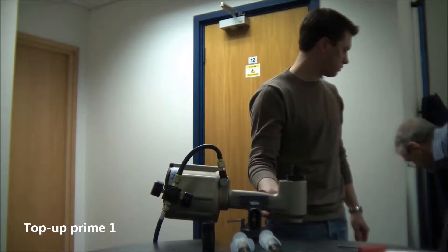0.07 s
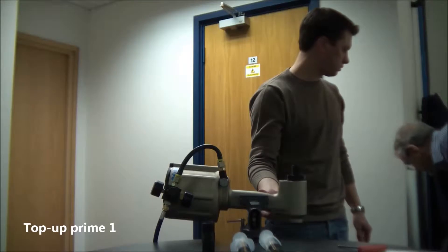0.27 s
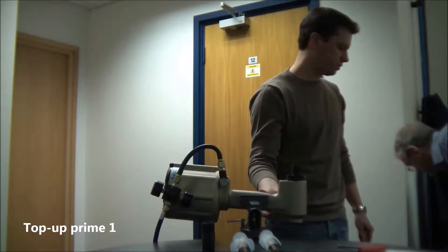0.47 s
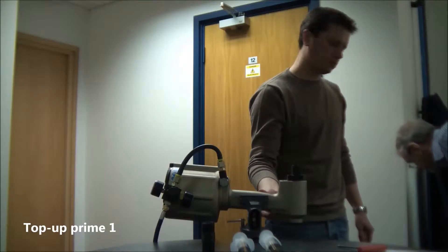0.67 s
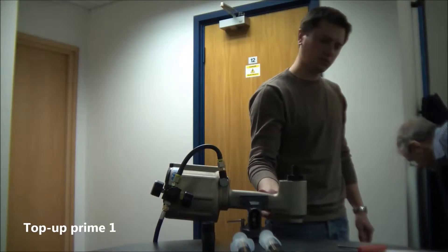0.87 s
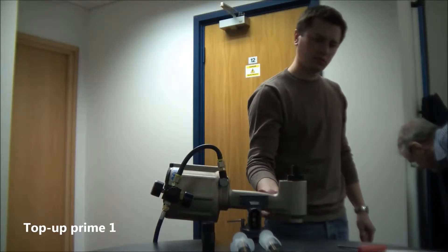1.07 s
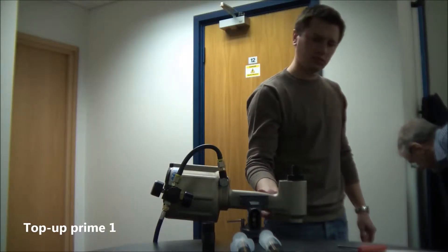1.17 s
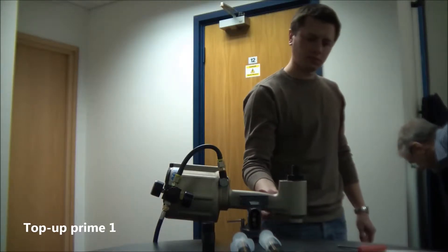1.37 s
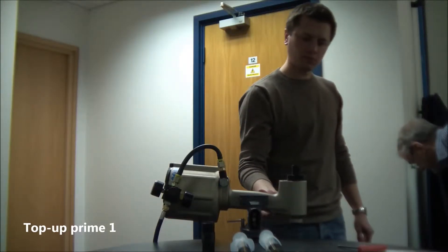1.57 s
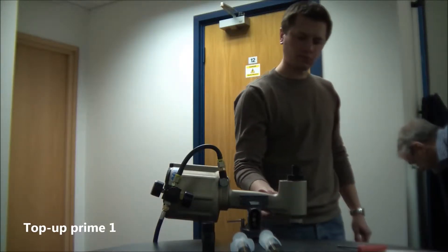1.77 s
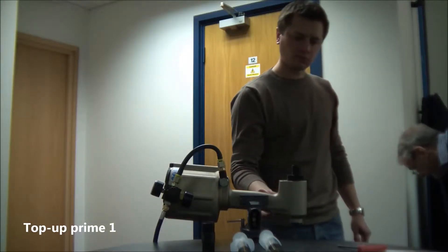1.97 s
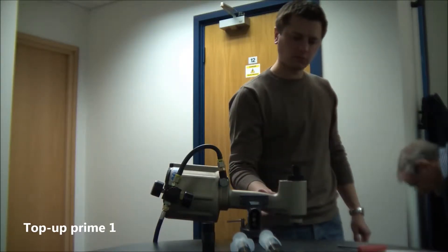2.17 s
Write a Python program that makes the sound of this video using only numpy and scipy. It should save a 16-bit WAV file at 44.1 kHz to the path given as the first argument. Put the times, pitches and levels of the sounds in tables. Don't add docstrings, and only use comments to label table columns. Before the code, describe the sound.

Compressed air escapes a tool close to the microphone: a faint leak and low hum, a sudden crack and overloaded blast, then a fading hiss with airy whistles and low hose gurgles in a small office.

```python
import sys
import numpy as np
from scipy import signal
from scipy.io import wavfile
from scipy.ndimage import uniform_filter1d

SR = 44100
rng = np.random.default_rng(int(sys.argv[2]) if len(sys.argv) > 2 else 0)


def generate_wav(sig):
    pcm = np.round(np.clip(np.atleast_2d(sig).T, -1, 1) * 32767).astype(np.int16)
    wavfile.write(sys.argv[1], SR, pcm)


def voltage_ratio(level):
    return 10 ** (np.asarray(level, float) / 20)


N = 97020

# pitch_hz, level_db
PORT_WIDTH = [(60, -12), (130, -25), (290, -35), (640, -27.5), (1400, -15.5), (3080, -11), (6760, -1.5),
              (14800, -2)]
# pitch_hz, level_db
PORT_LEAN = [(60, -1.0), (180, 0), (540, 0.12), (1640, 0.66), (4930, 0.23), (10000, 0), (14800, 1.2)]
SOURCE_WIDTH_HZ = 4600
# start_s, level_db
ROOM_GAIN = [
    (0, 0),
    (.21, 0),
    (.3, -11),
    (1.22, -8),
    (1.32, -2),
    (1.7, -2),
    (2.17, -2.5),
    (2.2, -3.5),
]
OVERLOAD = 1.27

# pitch_hz, level_db (per Hz)
RUMBLE, RUMBLE_DB = [(15, 4), (40, -0.5), (70, -2), (130, -11.5), (200, -41)], -36.5
# pitch_hz, level_db
HUM = [(100, -37.5), (200, -49)]
# pitch_hz, level_db (per Hz)
LEAK_BEFORE, LEAK_BEFORE_DB = [(76, -33), (130, -3.5), (250, -12), (374, -11), (430, -4.5), (525, -16.5),
                               (2540, -17.5), (3360, -3), (4300, -12), (6110, -15.5), (15300, -17)], -26.5
# pitch_hz, level_db (per Hz)
LEAK_AFTER, LEAK_AFTER_DB = [(76, -38), (130, -6.5), (250, -10.5), (448, -3), (485, -4.5), (956, -4.5),
                             (1770, -6), (3430, -5.5), (9860, -14), (15300, -26)], -26
# pitch_hz, level_db
DULL = [(12600, -3), (13300, -11), (15400, -11)]
# pitch_hz, width_hz, level_db
FITTING = [(3110, 620, -36), (3276, 57, -37.5), (3560, 300, -35.5), (3790, 120, -43.5), (14500, 900, -40),
           (5600, 680, -38), (10720, 1300, -34.5), (15078, 20, -43)]

# pitch_hz, level_db (per Hz)
CRACK, CRACK_S, CRACK_DB = [(350, -34), (600, -9), (1570, -8), (2560, -5), (2740, -7), (15300, -6)], 0.167, -18.5
POP_S, POP_DB, POP_RISE_S = 0.2108, -1.5, 0.00052
# pitch_hz, level_db, t60_s
POP = [
    (97, -1, 0.077),
    (300, -1, 0.018),
    (534, -12, 0.017),
    (900, 11.5, 0.0049),
    (1750, 3.5, 0.012),
]

# start_s, length_s, level_db, pitch_hz, width_hz
BLOWN = [(0.211, 0.077, -12, 2220, 77), (.27, 0.087, -15, 2280, 64), (.26, 0.096, -20.5, 1650, 92),
         (.212, 0.16, -10, 4510, 340), (0.213, 0.17, -11.5, 5260, 700), (.22, 0.14, -12, 5900, 860),
         (.21, .06, -19, 2700, 65), (.28, 0.084, -20.5, 2780, 270), (0.212, 0.12, -10, 10580, 930),
         (0.222, 0.11, -14.5, 12000, 2600), (0.21, .11, -19, 14300, 1400), (0.2084, 0.14, -8.5, 7600, 2900),
         (.211, 0.037, -12, 475, 250), (.213, 0.055, -16, 176, 100), (.213, 0.117, -20, 52, 73),
         (.22, 0.16, -21.5, 365, 220), (.24, 0.11, -20, 195, 194), (.25, 0.13, -21.5, 590, 320),
         (.36, 0.15, -39, 220, 120)]
# start_s, length_s, level_db, pitch_hz, width_hz
PIPES = [(0.25, 0.26, -24, 1850, 280), (0.49, 0.35, -28.5, 1650, 91), (0.37, 0.33, -26.5, 1830, 72),
         (0.632, 0.18, -21.5, 1800, 100), (0.712, 0.19, -19.5, 1775, 93), (0.4, .09, -22.5, 2100, 54),
         (0.465, 0.15, -24.5, 2100, 80), (.65, 0.15, -21.5, 2310, 74), (0.584, 0.11, -27, 2800, 55),
         (.52, .06, -29, 2910, 60), (0.804, 0.13, -19.5, 2340, 99), (0.825, 0.1, -22, 2570, 130),
         (0.905, 0.094, -23.5, 2680, 130), (0.98, 0.065, -24.5, 2080, 63), (1.044, 0.18, -23, 1840, 420),
         (1.03, 0.2, -21, 2480, 470), (1.05, 0.19, -24.5, 3550, 200), (1.074, 0.15, -30.5, 735, 184),
         (1, 0.074, -25.5, 10500, 1400), (1.22, 0.17, -24.5, 2440, 250), (1.19, 0.24, -23, 3440, 300),
         (1.205, 0.19, -29, 3150, 270), (1.36, 0.13, -28, 3470, 330), (1.92, 0.37, -33.5, 3460, 450),
         (1.26, 0.078, -34, 94, 49), (1.445, 0.12, -24, 5400, 1400), (1.48, 0.095, -26.5, 2400, 72),
         (1.772, 0.29, -26.5, 2120, 540), (1.778, 0.24, -31.5, 1570, 180), (1.79, .15, -31, 2920, 270)]
# start_s, length_s, level_db, pitch_hz, width_hz
GURGLES = [
    (1.36, 0.14, -28.5, 382, 202),
    (1.38, 0.14, -30.5, 810, 300),
    (1.37, 0.13, -34.5, 171, 80),
    (1.43, 0.14, -30.5, 603, 80),
    (1.47, 0.22, -34, 422, 200),
    (1.51, 0.15, -35.5, 840, 120),
    (1.57, 0.27, -28.5, 444, 217),
    (1.6, 0.18, -32.5, 663, 103),
]
# start_s, length_s, level_db, pitch_hz, width_hz
WHISTLE = [
    (1.17, 0.24, -25.5, 6720, 380),
]
STEADY, WHISTLE_HZ = 0.55, 170

# start_s, level_db, brightness (0-1)
FLOW = [(0.213, 3, 0.3), (0.223, -6, 0.3), (0.281, -5.5, 0.3), (0.485, -14, 0.3), (0.879, -16, 0.3),
        (0.957, -16, 0.3), (1.347, -21, 0.3), (1.367, -21.5, 0.3), (1.479, -19.5, 0.3), (1.783, -29.5, 0.3),
        (1.851, -25, 0.3), (2.1, -32, 0.3)]
# pitch_hz, level_db (per Hz)
BLAST = [(290, -33), (500, -11.5), (611, -5.5), (1010, -10), (1760, -2.5), (2870, 0), (4600, -0.5),
         (10700, -8), (15300, -9.5)]
# pitch_hz, level_db (per Hz)
VENT = [(180, -55), (310, -20.5), (1200, -8), (1440, -8.5), (1610, -3.5), (2380, -3.5), (3140, -5.5),
        (10700, -20), (15300, -22)]
# pitch_hz, level_db (per Hz)
LATE = [(530, -29), (900, -12), (1430, -7), (2160, -3.5), (3560, -3.5), (4350, -7.5), (5080, -7.5),
        (11100, -15.5), (15300, -15.5)]
EMPTY_S, EMPTY_SPAN_S = 1.23, 0.095
OFFICE_T60_S, OFFICE_DB = 0.31, -6

T = np.arange(N) / SR


def evened(x):
    return x / np.sqrt(np.mean(x ** 2) + 1e-20)


def read(points, hz):
    f, value = np.transpose(points)
    return np.interp(np.log(hz + 1), np.log(f + 1), value)


def curve(points, column):
    table = np.array(points)
    return np.interp(T, table[:, 0], table[:, column])


def drift(size):
    white = rng.standard_normal(N)
    return evened(uniform_filter1d(uniform_filter1d(white, size=size), size=size))


def air(colour_db, patchy_db, wider_db=0):
    frames = N // 256 + 5
    hz = np.fft.rfftfreq(1024, 1 / SR)
    a, b, c, d, patches = rng.standard_normal((frames, 513, 5)).T
    patches = uniform_filter1d(patches, size=8, axis=0)
    patches = evened(uniform_filter1d(patches, size=12, axis=1))
    side_db = read(PORT_WIDTH, hz) + wider_db * (hz < SOURCE_WIDTH_HZ)
    side = voltage_ratio(2 * np.minimum(side_db, 0))[:, None]
    same = (1 - side) / (1 + side)
    lean = voltage_ratio(0.5 * read(PORT_LEAN, hz))[:, None]
    left = a + 1j * b
    right = same * left + np.sqrt(1 - same ** 2) * (c + 1j * d)
    z = np.array([left * lean, right / lean])
    z *= voltage_ratio(colour_db(hz)[:, None] + patchy_db * patches)
    return evened(signal.istft(z, nperseg=1024, noverlap=768)[1][:, :N])


def resonate(x, hz, width, steady=0):
    turn = np.exp(2j * np.pi * np.cumsum(hz * np.ones(x.shape[1])) / SR)
    r = np.exp(-np.pi * 1.5 * width / SR)
    ring = abs(1 - r) * signal.lfilter([1], np.convolve([1, -r], [1, -r]), x / turn)
    ring = evened(ring.view(float)).view(complex)
    level = abs(ring.mean(0)) + 0.1
    return evened((turn * ring / level ** steady).real)


def rumble():
    return voltage_ratio(RUMBLE_DB) * air(lambda hz: read(RUMBLE, hz), patchy_db=1.5)


def hum():
    tones = sum(np.sqrt(2) * voltage_ratio(db) * np.sin(2 * np.pi * hz * T) for hz, db in HUM)
    return voltage_ratio(1.6 * drift(1500)) * tones


def leak(spent):
    before = air(lambda hz: read(LEAK_BEFORE, hz), patchy_db=1.5, wider_db=-1)
    after = air(lambda hz: read(LEAK_AFTER, hz) + read(DULL, hz), patchy_db=1)
    hiss = (1 - spent) * voltage_ratio(LEAK_BEFORE_DB) * before + spent * voltage_ratio(LEAK_AFTER_DB) * after
    white = air(np.zeros_like, patchy_db=1.5, wider_db=-6)
    for hz, width, db in FITTING:
        loss_db = 3.1 * (hz > 8000) + 25 * (hz > 13000)
        hiss = hiss + voltage_ratio(db - spent * loss_db) * resonate(white, hz, width)
    return hiss


def room():
    spent = np.clip((T - 0.3) / 1.5, 0, 1)
    return (leak(spent) + rumble() + hum()) * voltage_ratio(curve(ROOM_GAIN, column=1))


def office(x):
    at = np.arange(130, SR // 2, 20)
    at = at + rng.integers(0, 20, len(at))
    taps = np.zeros(SR // 2 + 20)
    taps[at] = rng.choice([-1., 1.], len(at)) * voltage_ratio(-60 * at / SR / OFFICE_T60_S)
    taps /= np.linalg.norm(taps)
    return x + voltage_ratio(OFFICE_DB) * signal.fftconvolve(x, taps[None], axes=1)[:, :N]


def crack():
    u = (T - CRACK_S) / (POP_S - CRACK_S)
    swell = np.clip(u, 0, 1) ** 0.37 * (u < 1.2)
    return voltage_ratio(CRACK_DB) * swell * air(lambda hz: read(CRACK, hz), patchy_db=0.5)


def pop():
    t = np.maximum(T - POP_S, 0)
    rings = sum(-voltage_ratio(db - 60 * t / t60) * np.sin(2 * np.pi * hz * t) for hz, db, t60 in POP)
    return voltage_ratio(POP_DB) * np.minimum(t / POP_RISE_S, 1) * rings


def spells(rows, rise_share, flutter_db, sink=0, wider_db=0):
    white = air(np.zeros_like, patchy_db=1.5, wider_db=wider_db)
    breath = white * voltage_ratio(flutter_db * drift(300))
    out = np.zeros((2, N))
    for k, (start, length, db, hz, width) in enumerate(rows):
        u = np.clip((T - start) / length, 0, 1)
        shape = np.sin(np.pi / 2 * np.minimum(u / rise_share, (1 - u) / (1 - rise_share)))
        at = np.flatnonzero(shape > 0)
        own_breath = np.roll(breath, 3001 * k, 1)[:, at]
        pitch = hz * (1 - sink * u[at] ** 2)
        ring = resonate(own_breath, pitch, width, STEADY * (width < WHISTLE_HZ))
        out[:, at] += voltage_ratio(db) * shape[at] * ring
    return out


def pipework():
    pipes = spells(PIPES, rise_share=0.4, flutter_db=0)
    gurgles = spells(GURGLES, rise_share=0.22, flutter_db=0.5, wider_db=5)
    blown = spells(BLOWN, rise_share=0.06, flutter_db=0.5, wider_db=4)
    whistle = spells(WHISTLE, rise_share=0.21, flutter_db=1.5, sink=0.12)
    return pipes + gurgles + blown + whistle


def jet():
    bright = np.clip(curve(FLOW, column=2), 0, 1)
    wide = air(lambda hz: read(BLAST, hz), patchy_db=0.5)
    narrow = air(lambda hz: read(VENT, hz), patchy_db=1)
    late = air(lambda hz: read(LATE, hz) + read(DULL, hz), patchy_db=1)
    empty = np.clip((T - EMPTY_S) / EMPTY_SPAN_S, 0, 1)
    full = np.sqrt(bright) * wide + np.sqrt(1 - bright) * narrow
    stream = np.sqrt(1 - empty) * full + np.sqrt(empty) * late
    opening = np.clip((T - FLOW[0][0]) / 0.004, 0, 1)
    closing = np.clip((FLOW[-1][0] - T) / 0.04, 0, 1)
    return opening * closing * voltage_ratio(curve(FLOW, column=1) - 1) * stream


def scene():
    return room() + office(jet() + pipework()) + crack() + pop()


def low_pass(x):
    return signal.sosfilt(signal.butter(12, 15320, fs=SR, output="sos"), x)


def record(dry):
    mix = OVERLOAD * np.tanh(dry / OVERLOAD)
    return low_pass(mix)


dry = scene()
out = record(dry)
generate_wav(out)
```